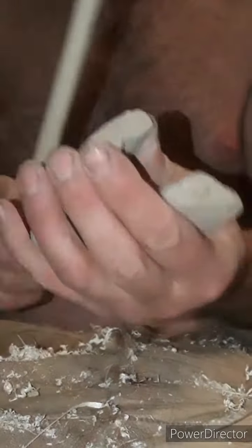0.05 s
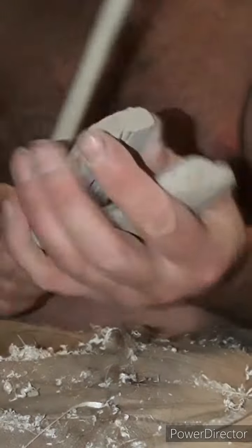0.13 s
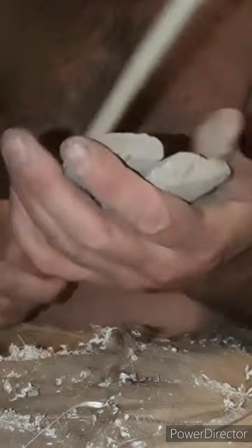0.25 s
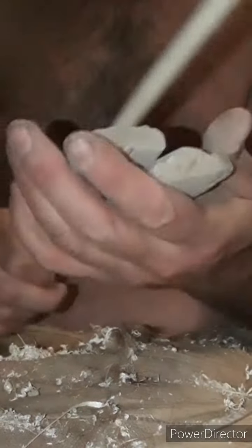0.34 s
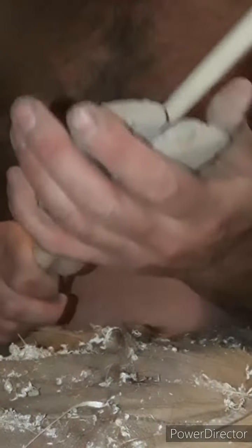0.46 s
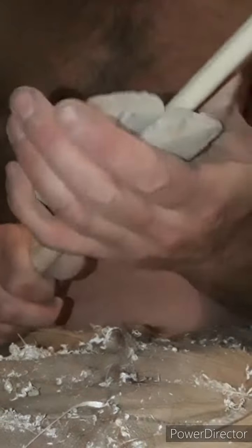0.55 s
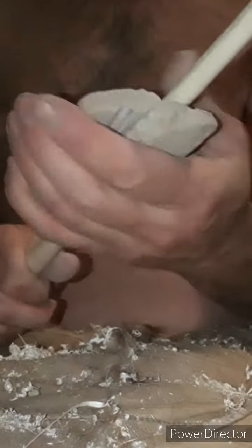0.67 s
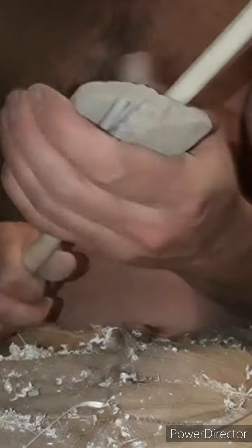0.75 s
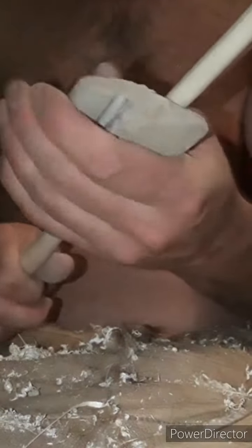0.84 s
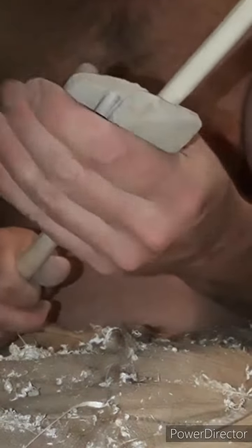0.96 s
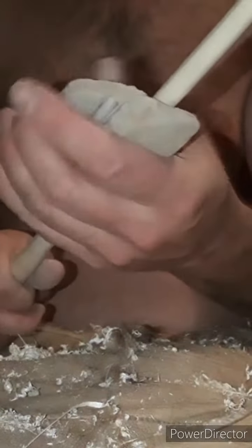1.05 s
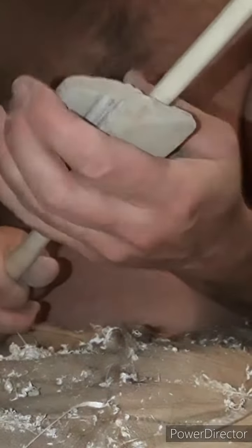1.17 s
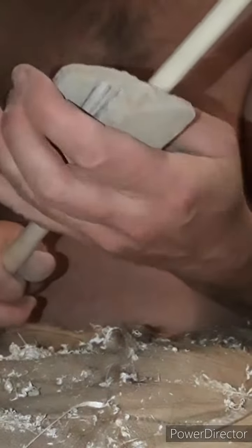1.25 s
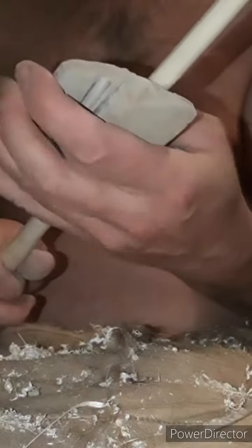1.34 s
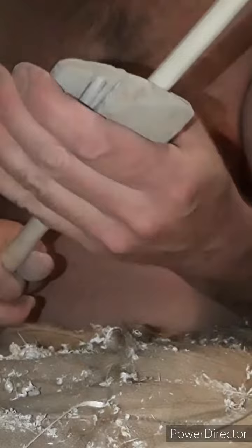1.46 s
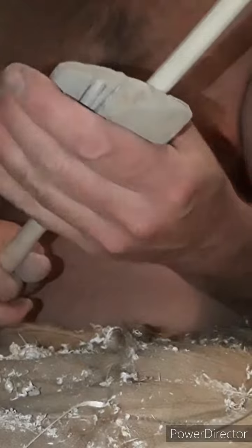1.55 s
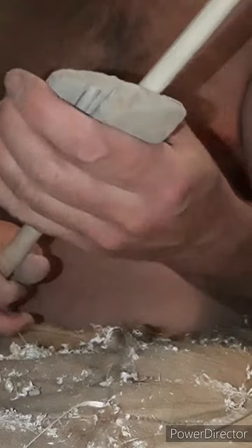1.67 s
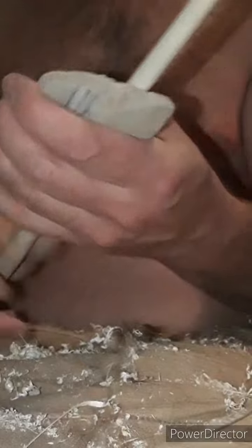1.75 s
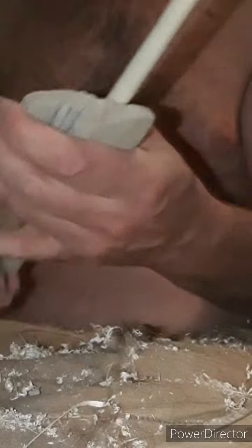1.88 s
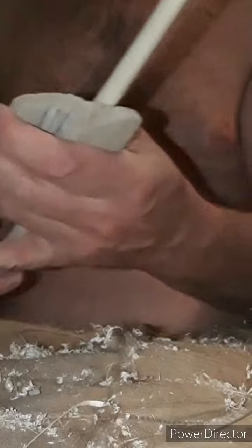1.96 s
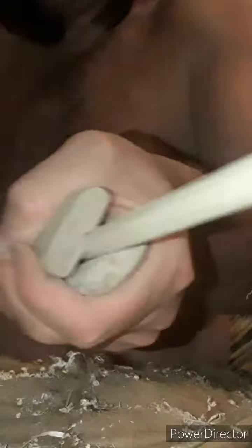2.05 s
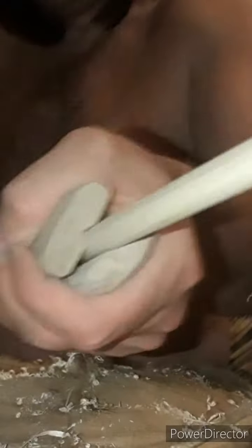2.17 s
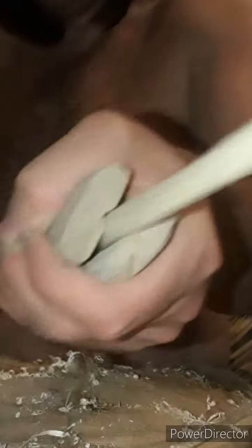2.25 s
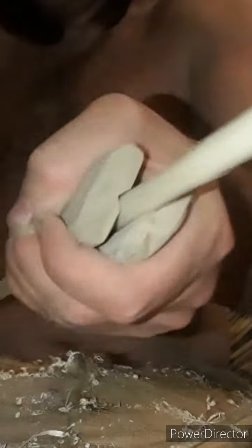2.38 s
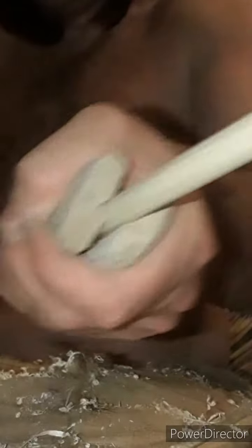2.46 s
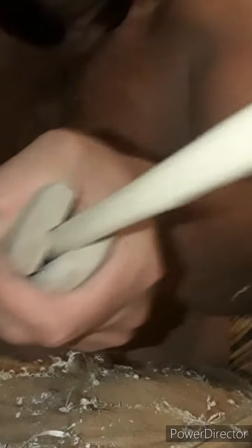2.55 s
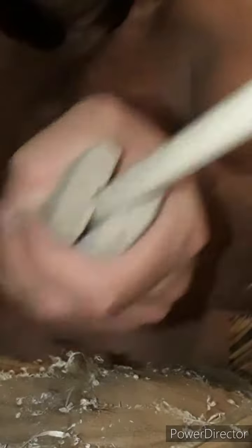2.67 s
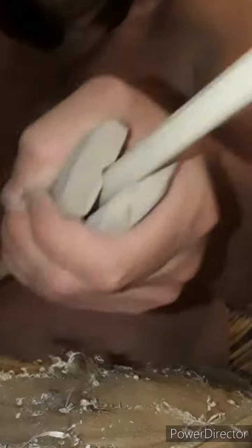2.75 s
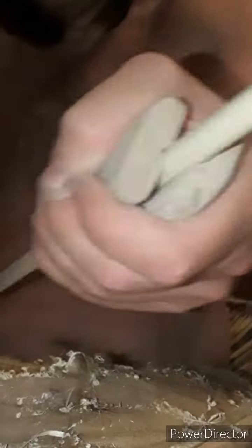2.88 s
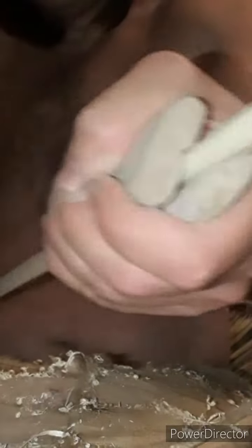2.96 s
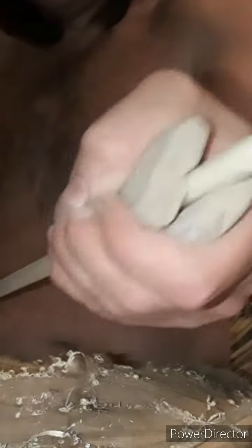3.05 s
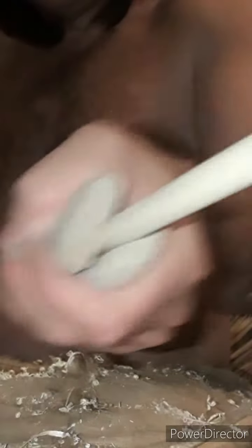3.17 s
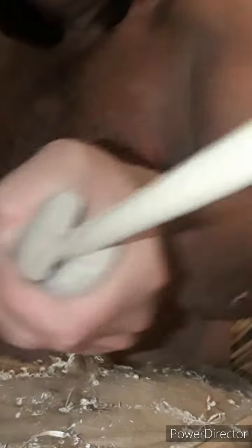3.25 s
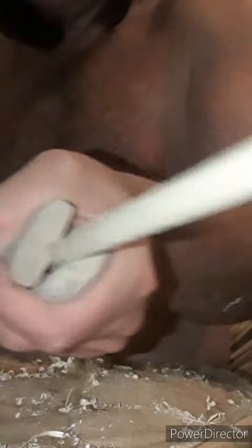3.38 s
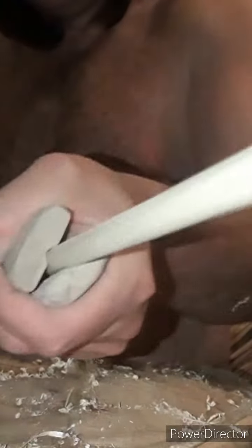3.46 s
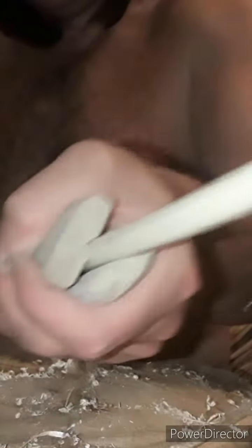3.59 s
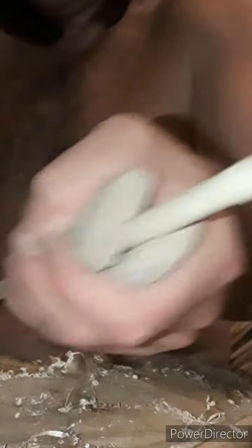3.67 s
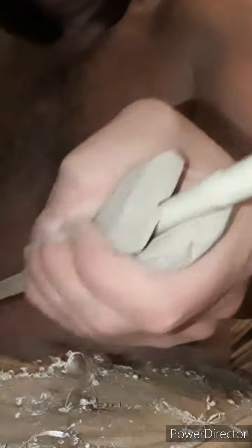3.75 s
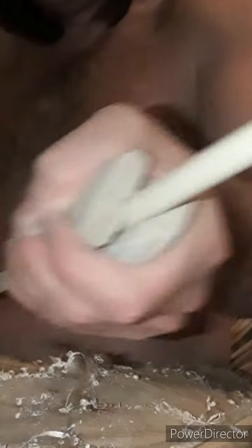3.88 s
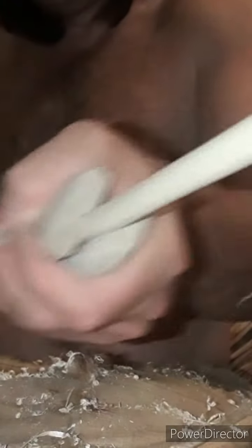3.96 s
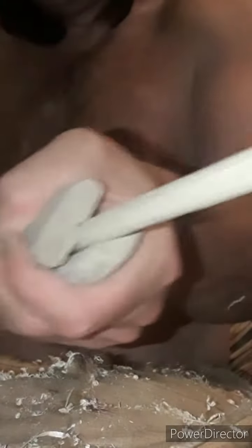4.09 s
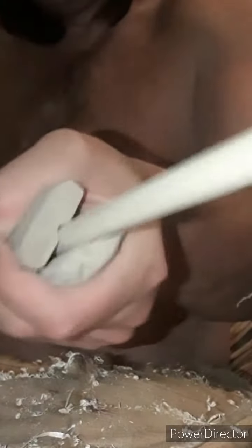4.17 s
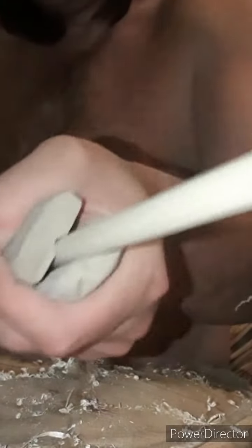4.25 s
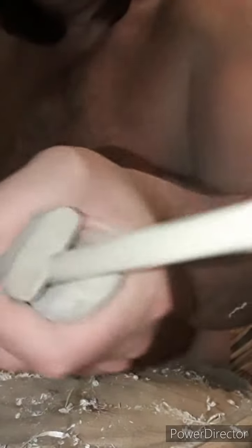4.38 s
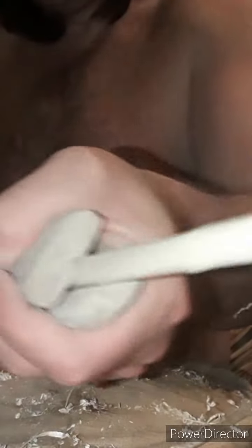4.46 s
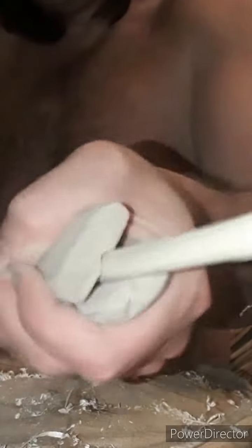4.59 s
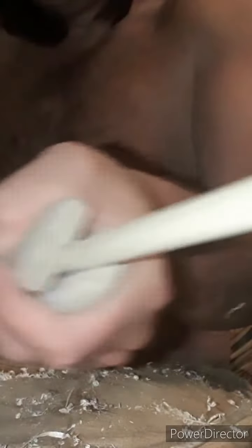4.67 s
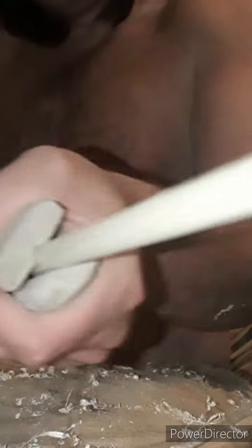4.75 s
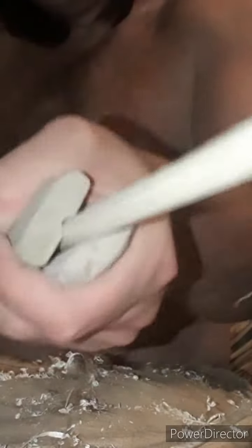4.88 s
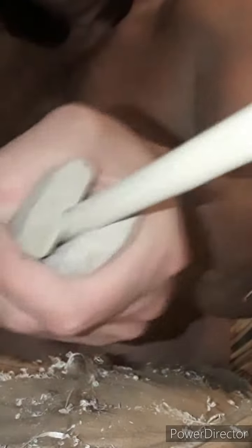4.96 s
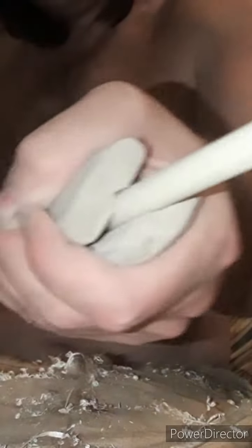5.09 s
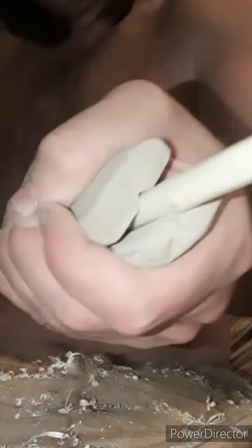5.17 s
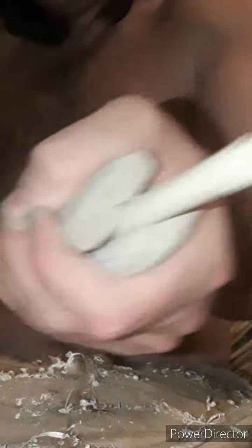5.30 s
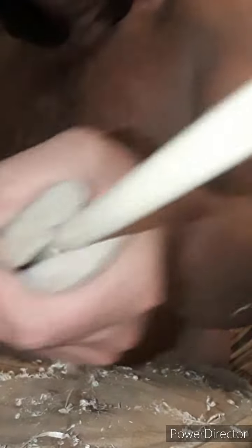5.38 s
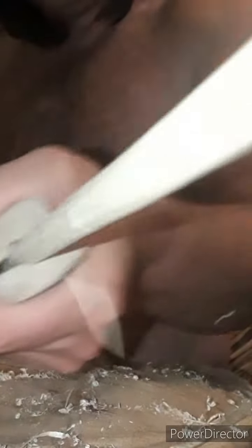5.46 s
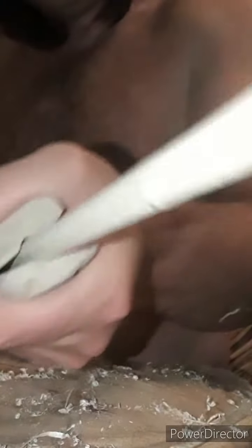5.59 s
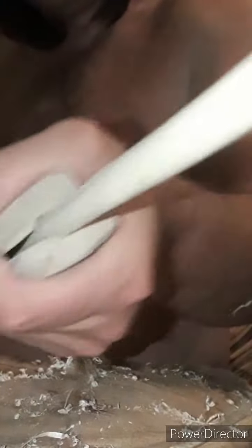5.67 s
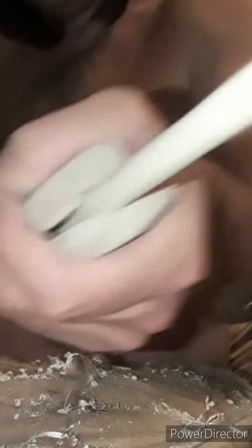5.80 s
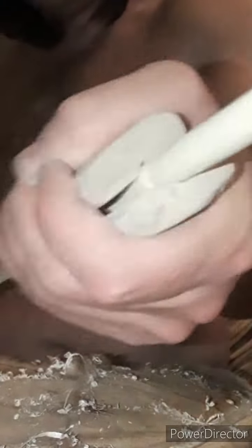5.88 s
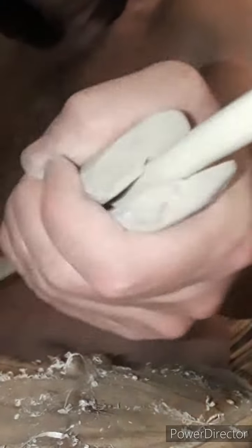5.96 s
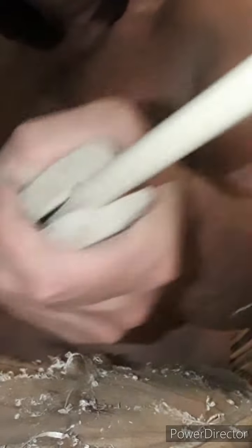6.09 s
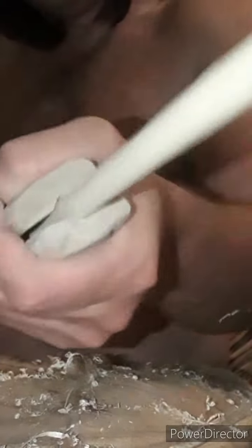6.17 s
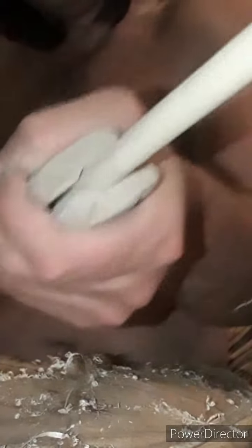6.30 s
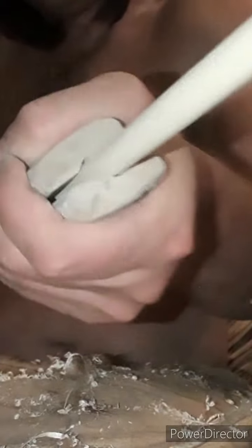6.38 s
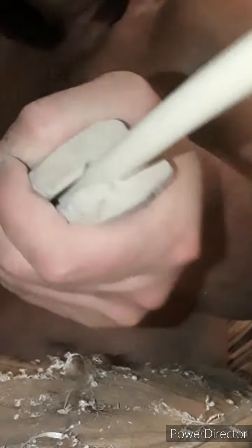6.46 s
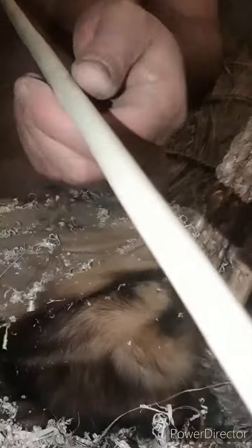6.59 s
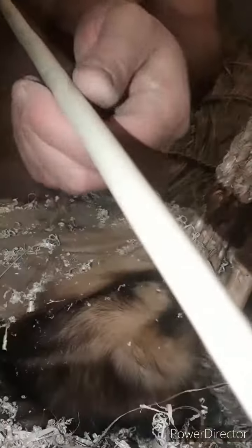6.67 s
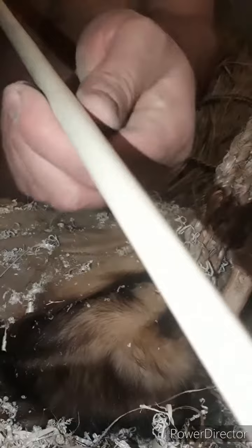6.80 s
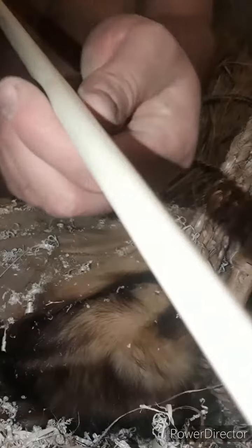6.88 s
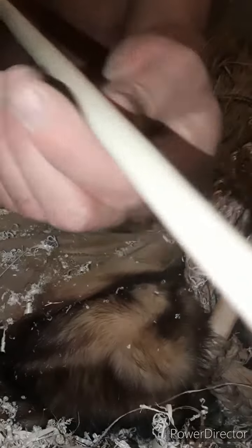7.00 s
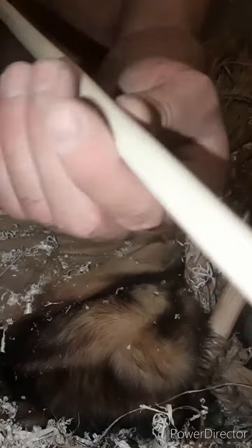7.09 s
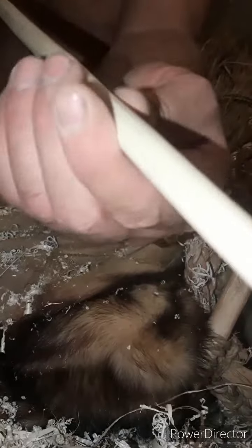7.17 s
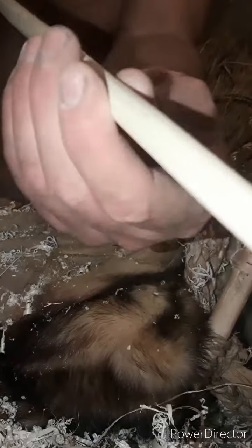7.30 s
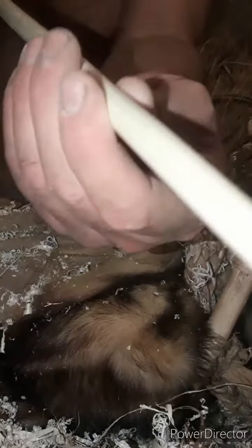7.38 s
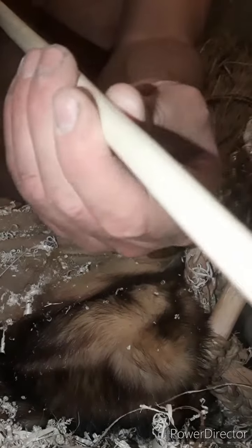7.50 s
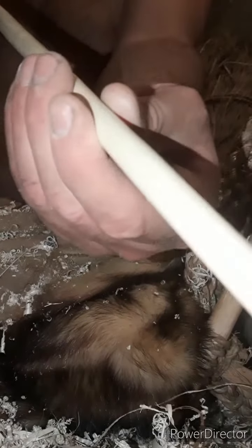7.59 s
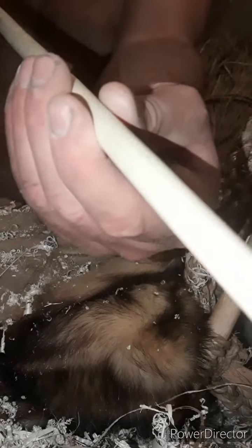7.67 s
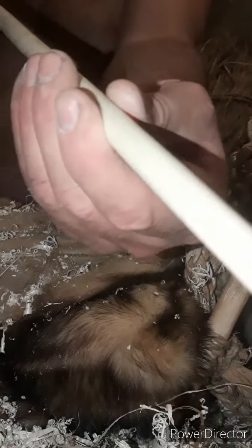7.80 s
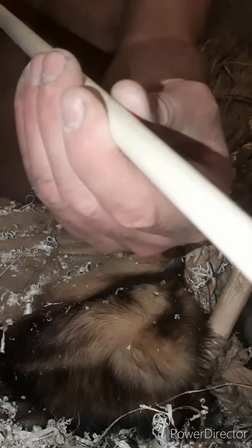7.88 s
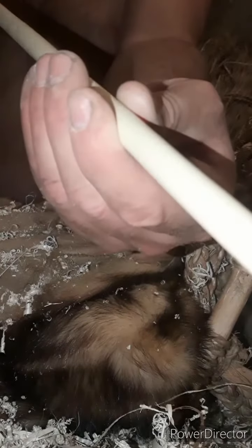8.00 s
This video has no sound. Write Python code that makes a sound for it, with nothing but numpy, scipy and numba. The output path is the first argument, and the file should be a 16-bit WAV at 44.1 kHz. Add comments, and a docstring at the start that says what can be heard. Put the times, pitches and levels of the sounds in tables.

```python
"""Two grooved stones, held in one hand, grind and click as they close round a wooden shaft in a quiet shed.
Thirteen strokes then rasp to and fro, knocking at rough spots; last a bare palm hisses along the wood.
Short silences part the three. Stone and shaft are banks of damped modes, struck or excited by noise;
the rasp is coloured noise driven by hand speed, combed by a delayed copy from the shaft's tip.
Rumble, hum and hiss lie underneath."""
import sys
import numpy as np
from scipy import signal
from scipy.fft import rfft, irfft, next_fast_len
from scipy.io import wavfile
from scipy.ndimage import uniform_filter1d, map_coordinates
from numba import njit

SR = 44100
rng = np.random.default_rng(int(sys.argv[2]) if len(sys.argv) > 2 else 0)


def attenuation_scalar(level_db):
    """Turn a level in dB into a linear amplitude multiplier (20 dB per decade)."""
    decades = np.asarray(level_db, float) / 20
    return 10 ** decades


def log_audio(samples):
    """Write samples as a 16-bit WAV file to the path given in sys.argv[1]."""
    # one column per channel
    frames = np.atleast_2d(samples).T
    # limit to full scale, then quantise
    limited = np.clip(frames, -1, 1)
    pcm = np.round(limited * 32767).astype(np.int16)
    wavfile.write(sys.argv[1], SR, pcm)


N = 354563
T = np.arange(N) / SR

# shaft modes: pitch_hz, level_db, undamped t60_s
SHAFT_MODES = [(357, 16, 0.06), (606, -7.5, 0.052), (850, 8, 0.043), (946, 7, 0.028), (1290, 10.5, 0.011),
               (1538, -2.5, 0.031), (1790, 0, 0.036), (1950, -4, 0.063), (2522, 5.5, 0.015),
               (2674, 2.5, 0.045), (2987, 2.5, 0.022)]
# shaft catching in the groove: start_s, level_db, favoured_hz, crack_db (re level_db)
CATCHES = [(2.509, -33, 2680, -8), (2.73, -57, 1560, 8), (2.761, -60, 926, 16), (2.939, -32, 1730, -8),
           (2.969, -33, 1180, -14), (2.997, -30, 1590, -14), (3.081, -42, 853, -10), (3.178, -38, 1400, -8),
           (3.24, -33, 2610, -4), (3.254, -33, 850, -10), (3.325, -32, 1500, -8), (3.335, -32, 1500, -8),
           (3.955, -32, 1300, -6), (4.199, -52, 2700, 4), (4.727, -35, 950, -12), (4.913, -54, 2700, 4),
           (5.105, -28, 2380, -4), (5.137, -43, 450, -10), (5.452, -30, 2800, -10), (6.148, -32, 2690, -8),
           (6.343, -46, 2730, 6), (4.704, -22, 1900, -3), (5.441, -23, 2500, 3), (6.126, -24, 1800, -4),
           (6.136, -24, 2600, -5)]
# silences between the parts: sound_out_s, sound_back_s
SILENCES = [(2.066, 2.123), (6.478, 6.535)]


def unit(x):
    """Scale to rms 1."""
    return x / np.sqrt(np.mean(x ** 2))


def colour(x, points):
    """Filter by (Hz, dB) points, straight in dB over log frequency."""
    hz, db = np.transpose(points)
    size = next_fast_len(len(x))
    bin_hz = np.arange(1, size // 2 + 2) * SR / size
    gain = attenuation_scalar(np.interp(np.log(bin_hz), np.log(hz), db))
    return irfft(rfft(x, size) * gain, size)[:len(x)]


def ring(x, hz, t60_s):
    """One fixed resonance, silent at both ends of the spectrum."""
    radius = np.exp(-np.log(1000) / (t60_s * SR))
    angle = 2 * np.pi * hz / SR
    return signal.lfilter([.5, 0, -.5], [1, -2 * radius * np.cos(angle), radius ** 2], x)


@njit
def glide(x, hz, sharp):
    """Band-pass of Q sharp whose centre moves every sample."""
    y = np.empty(len(x))
    band, low, k = 0., 0., 1 / sharp
    for i in range(len(x)):
        g = np.tan(np.pi * hz[i] / SR)
        v = (band + g * (x[i] - low)) / (1 + g * (g + k))
        band = 2 * v - band
        low += 2 * g * v
        y[i] = k * v
    return y


def grit(scatter_db):
    """Dense micro-slips of uneven size: noise with random sample-by-sample gain."""
    boost_db = scatter_db * np.minimum(rng.standard_exponential(N), 4)
    return unit(rng.standard_normal(N) * attenuation_scalar(boost_db))


def walk(rate_hz):
    """Random levels held 1 / rate_hz s and slewed twice."""
    hold = int(SR / rate_hz)
    held = np.repeat(rng.standard_normal(N // hold + 1), hold)
    return 1.1 * uniform_filter1d(uniform_filter1d(held, hold), hold)[:N]


def rubbed(modes, lo_hz, hi_hz, damp, scatter_db=2):
    """Grit exciting the modes between two pitches, their t60 scaled by the grip."""
    x = grit(scatter_db)
    return unit(sum(attenuation_scalar(db) * unit(ring(x, hz, t60_s * damp))
                    for hz, db, t60_s in modes if lo_hz < hz < hi_hz))


def blow(modes, favour_hz, octaves, damp, contact_ms):
    """One hit, peak 1: the place struck favours modes near one pitch; the push builds over the contact time."""
    t = T[:4096]
    y = 0
    for hz, db, t60_s in modes:
        level_chance, pitch_chance, phase_chance = rng.standard_normal(3)
        place = (np.log2(hz / favour_hz) / octaves) ** 2
        decay = np.exp(-place - np.log(1000) * t / (t60_s * damp))
        tone = np.sin(2 * np.pi * hz * (1 + 0.0083 * pitch_chance) * t + .5 * phase_chance)
        y = y + attenuation_scalar(db + 1.6 * level_chance) * decay * tone
    y = y * np.sin(np.pi / 2 * np.clip(t * 1000 / contact_ms, 0, 1)) ** 2
    return y / np.abs(y).max()


def add(out, s, x):
    """Mix x into out at time s."""
    i = int(s * SR)
    out[i:i + len(x)] += x[:N - i]


def shed():
    """Filtered noise for rumble and microphone hiss, plus a wavering hum; near mono, with a little side noise."""
    # room tone: pitch_hz, level_db (per Hz)
    tone_points = [(15, -53.5), (25, -34), (108, -2), (175, -10), (503, -23), (659, -24), (840, -24.5),
                   (911, -24.5), (1700, -30), (3720, -27.5), (5140, -27), (5730, -28.5), (8360, -42.5),
                   (14000, -21), (16000, -30)]
    # faint side noise, quieter than the middle at most pitches: pitch_hz, side_minus_mid_db
    side_points = [(60, -20.5), (110, -25.5), (200, -22.5), (380, -16.5), (700, -13.5), (1290, -11),
                   (2380, -8.5), (4400, -10), (8120, 2.5), (15000, -14.5)]
    mid = unit(colour(rng.standard_normal(N), tone_points))
    side = colour(unit(colour(rng.standard_normal(N), tone_points)), side_points)
    hum = attenuation_scalar(-9.5 + 2.1 * walk(3.7)) * unit(ring(rng.standard_normal(N), 119, 0.17))
    return attenuation_scalar(-68) * (mid + hum + side * np.array([[1], [-1]]))


def scrapes():
    """Gains of the four rings of dragging stones: quick onset, a sag while dragging, then dying away."""
    # drags: start_s, length_s, main_ring_db, upper_ring_db, lower_ring_db, shaft_db
    drags = [(0, 0.045, -64, -71, -56, -68), (0.157, 0.22, -65, -64.5, -72, -80),
             (0.242, 0.033, -78, -58.5, -51, -90), (0.29, 0.049, -76, -68, -59, -71),
             (0.554, 0.094, -72, -64.5, -59.5, -61.5), (0.615, 0.16, -59, -66, -78, -73.5),
             (0.79, 0.062, -60, -68, -85, -90), (0.844, 0.1, -62, -64, -70, -75),
             (0.89, 0.059, -54, -64, -61, -63.5), (0.913, 0.035, -56, -57, -54.5, -70),
             (.95, 0.091, -56.5, -60.5, -57.5, -63.5), (1.095, 0.065, -60.5, -68, -70, -76),
             (1.205, 0.085, -56, -59.5, -82, -80), (1.26, 0.048, -54, -64, -54, -60.5),
             (1.371, 0.089, -55.5, -60.5, -67, -78), (1.446, 0.11, -58, -59.5, -63.5, -77),
             (1.6, 0.15, -73, -77, -82, -90), (1.8, .25, -84, -79.5, -92, -87)]
    attack_s, sag_db, t60_s = 0.0036, 11, 0.22
    power = 0
    for s, length_s, *ring_db in drags:
        t = T - s
        fall_db = sag_db * np.clip(t / length_s, 0, 1) + 60 * np.maximum(t - length_s, 0) / t60_s
        envelope = np.clip(t / attack_s, 0, 1) * attenuation_scalar(-fall_db)
        power = power + (attenuation_scalar(np.array(ring_db)[:, None]) * envelope) ** 2
    return np.sqrt(power)


def seating():
    """The stones grind lightly and click as the hand closes on the shaft; the grip shifts their main ring."""
    # stone modes: pitch_hz, level_db, undamped t60_s
    stone_modes = [(2880, -26.5, 0.11), (3067, -29, 0.081), (3504, -16, 0.038), (3690, -20.5, 0.15),
                   (3950, -17.5, 0.073), (4160, -23, 0.12), (4605, -3.5, 0.14), (4930, 1, 0.13),
                   (6056, -4.5, 0.095), (6030, -18, 0.048), (7270, -12.5, 0.036), (7560, -12.5, 0.2)]
    # main ring under the grip: time_s, pitch_hz
    grip = [(0, 4560), (.21, 4970), (.26, 4600), (.68, 4590), (.81, 4880), (1.2, 5100), (1.31, 4960),
            (1.5, 5040), (1.8, 4840)]
    # stone on stone: start_s, main_ring_peak_db, favoured_hz, upper_ring_db, shaft_db (both re main ring)
    clicks = [(0.002, -41.5, 4400, -20, -36), (0.018, -49, 4520, -28, -40), (0.159, -58, 4600, -5, 0),
              (0.238, -35, 4920, 1.5, -43.5), (0.2424, -30.5, 4700, -21, -38), (0.249, -36, 3530, 3, -33),
              (0.2912, -17, 4540, -26, -45), (0.2943, -37, 4570, -34, -44),
              (0.3002, -26.5, 4280, -8.5, -33.5), (0.305, -35, 4500, -28, -37.5),
              (0.3119, -29.5, 4400, -15, -34.5), (0.552, -53.5, 4520, -14, 0),
              (0.5806, -43.5, 4600, -11, 0.5), (0.5967, -46.5, 4550, -23.5, 6.5),
              (0.697, -46, 4460, -26, -15), (0.7903, -55, 4990, -18, -26), (0.8877, -55, 4890, -21, -7),
              (0.9763, -46, 4870, -36, -16), (1.0042, -49, 5120, 0, -19), (1.1092, -50, 5100, -22, -25),
              (1.209, -49.5, 5200, -17.5, -35.5), (1.2511, -45, 5230, -4, -28),
              (1.2642, -27.5, 5350, -28, -20), (1.273, -32.5, 4130, -23.5, -17),
              (1.3768, -55, 4930, -8, -30), (1.4506, -40, 5380, -20, -20)]
    main_hz = np.interp(T, *np.transpose(grip))
    on_main, on_upper, on_lower, on_shaft = scrapes()
    main = unit(glide(glide(grit(3), main_hz, 15.0), main_hz, 4.2))
    upper = rubbed(stone_modes, 6500, 9000, 0.27)
    lower = rubbed(stone_modes, 2400, 4400, 0.26)
    shaft = rubbed(SHAFT_MODES, 900, 1100, 0.51)
    grind = on_main * main + on_upper * upper + on_lower * lower + on_shaft * shaft
    out = attenuation_scalar(2 * walk(58.56)) * grind
    for s, db, hz, upper_db, shaft_db in clicks:
        hit = blow(stone_modes, hz, 0.12, 0.25, 1.1)
        hit = hit + attenuation_scalar(upper_db) * blow(stone_modes, 6890, 0.11, 0.555, 0.93)
        hit = hit + attenuation_scalar(-15.5) * blow(stone_modes, 3110, 0.18, 0.13, 1.0)
        hit = hit + attenuation_scalar(shaft_db) * blow(SHAFT_MODES, 1230, 0.42, 0.44, 0.97)
        add(out, s, attenuation_scalar(db) * hit)
    return out


def sweep(s, length_s, fastest=0.42):
    """Hand speed 0-1 over one movement, peaking at the share fastest of its length."""
    u = np.clip((T - s) / length_s, 0, 1)
    bend = np.log(.5) / np.log(np.clip(fastest, .2, .8))
    return np.abs(np.sin(np.pi * u ** bend))


def strokes():
    """Rasp gain from hand speed, tip lag from distance travelled, judder and bending from both."""
    # strokes: start_s, length_s, rasp_db, fastest_share, judder_db, bending_db
    # (judder and bending re rasp, before the fade with lag)
    moves = [(2.024, 0.4, -41, 0.61, -4, -10), (2.426, 0.31, -40.5, 0.52, -7.5, -13),
             (2.763, 0.33, -42.5, 0.46, -4.5, -10.5), (3.079, 0.37, -39.5, .58, -7.5, -12.5),
             (3.485, 0.37, -40.5, .44, -7, -12), (3.811, 0.33, -38, 0.64, -3.5, -15),
             (4.184, 0.42, -41.5, 0.44, -10.5, -20), (4.598, 0.29, -40, 0.59, -10.5, -24),
             (4.934, 0.35, -42.5, 0.48, -8.5, -16.5), (5.271, 0.34, -39.5, 0.59, -7, -17.5),
             (5.63, 0.36, -40, 0.54, -7.5, -12.5), (5.968, 0.37, -41, .56, -12.5, -21.5),
             (6.341, 0.37, -41, 0.42, -11, -21.5)]
    # lag_ms of the tip's sound at each turn
    # (longer = tip pokes further out; under 0 = short free end, tip's copy unheard)
    turn_lag_ms = [0.62, -.2, 0.446, -.25, .72, -0.38, 0.776, -.25, .42, -.25, .4, -.25, 0.422, -0.059]
    # short jerks of the hand, mostly at a turn: start_s, length_s, rasp_db
    jerks = [(2.745, 0.035, -56), (3.086, 0.041, -47.5), (4.912, 0.044, -56), (6.34, 0.032, -54.5),
             (2.59, 0.068, -42)]
    speed_law, rest_db = 1.23, -72.5  # rasp amplitude goes with speed to this power
    surge_db, surge_s = -9.5, 0.0062  # a knock makes the grit bite harder for a moment
    shake_law = 0.29  # judder and bending grow faster with speed than the rasp does
    fade_lag_ms, fade_limit_ms = 0.079, 0.2  # they fade past this lag, over at most this much more
    judder_db_per_ms, bend_db_per_ms = 45.5, 35

    power, lag_ms = attenuation_scalar(rest_db) ** 2, turn_lag_ms[0]
    for (s, length_s, db, fastest, _, _), move_ms in zip(moves, np.diff(turn_lag_ms)):
        speed = sweep(s, length_s, fastest)
        power = power + (attenuation_scalar(db) * speed ** speed_law) ** 2
        lag_ms = lag_ms + move_ms * np.cumsum(speed) / speed.sum()
    for s, length_s, db in jerks:
        power = power + (attenuation_scalar(db) * sweep(s, length_s)) ** 2
    for s, db, _, _ in CATCHES:
        surge = (T > s) * np.exp(-np.abs(T - s) / surge_s)
        power = power + (attenuation_scalar(db + surge_db) * surge) ** 2

    rows = np.array(moves)
    now = np.maximum(np.searchsorted(rows[:, 0], T) - 1, 0)
    out_ms = np.clip(lag_ms - fade_lag_ms, 0, fade_limit_ms)
    shake_db = shake_law * (10 * np.log10(power) - rows[now, 2])
    judder_db = shake_db + rows[now, 4] - judder_db_per_ms * out_ms
    bend_db = shake_db + rows[now, 5] - bend_db_per_ms * out_ms
    return np.sqrt(power), lag_ms, judder_db, bend_db


def fibre_rasp(lag_ms):
    """Grit tears the wood fibres: coloured noise, plus a copy leaving by the tip that draws moving combs."""
    # rasp spectrum: pitch_hz, level_db (per Hz)
    rasp_points = [(1000, -44), (1600, -11), (2150, -19), (2600, -6), (3250, -1), (3600, 0), (4950, 5),
                   (6250, 0.5), (8150, 0.5), (9850, -11.5), (12000, -9.5), (14000, -10.5), (15400, -14.5),
                   (16000, -38)]
    rasp = colour(grit(2.3), rasp_points)
    body = unit(colour(rasp, [(8800, -20.5), (10000, -34)]))
    body = body + attenuation_scalar(-9.5 + 3.1 * walk(12)) * rubbed(SHAFT_MODES, 2200, 3200, .5)
    dust = unit(colour(rasp, [(8800, -41.5), (10000, -29.5)]))
    bright = attenuation_scalar(1.59 * walk(40) + 1.04 * walk(13)) * (unit(body) + attenuation_scalar(-12.5) * dust)
    # tip's copy: a quarter turn ahead in phase, treble favoured by the thin tip
    turned = -signal.hilbert(bright, next_fast_len(N)).imag[:N]
    turned = colour(turned, [(2500, -16.5), (7000, 6)])
    share = .36 * np.clip((lag_ms - .1) / .1, 0, 1)
    delay = (lag_ms + 0.013 * walk(60)) * SR / 1000
    tip = map_coordinates(turned, [np.arange(N) - delay], order=3)
    return (bright + share * tip) / np.sqrt(1 + share ** 2)


def bending(lag_ms):
    """Free end as a clamped rod, pitch going with one over free length squared: lowest mode and overtones."""
    # overtones: multiple of lowest pitch, level_db
    overtone_rows = [(3.2, 0), (6.3, -2)]
    free_cm = 10.28 + (.17 * np.logaddexp(0, lag_ms / .17) - .15) / 0.0421
    hz = np.minimum(56000 / free_cm ** 2, 1500.)
    slips = grit(3.45) * attenuation_scalar(7.8 * walk(50))
    lowest = unit(glide(glide(slips, hz, 4.3), hz, 0.58) / np.sqrt(hz))
    overtones = 0
    for k, db in np.array(overtone_rows):
        tone = glide(glide(slips, k * hz, 12.), k * hz, 3.) / np.sqrt(k * hz)
        overtones = overtones + attenuation_scalar(db) * tone
    return lowest, unit(overtones)


def knock(out, s, db, hz, crack_db):
    """Shaft catching in the groove: a struck-shaft thud plus a sharp burst of ringing noise."""
    thud = colour(blow(SHAFT_MODES, hz, 0.51, 0.75, 1100 / hz), [(150, -28), (500, 0)])
    crack = signal.lfilter([1, -1], 1, rng.standard_normal(2048)) * np.exp(-T[:2048] / 0.00178)
    crack = ring(ring(crack, 4500, 0.00129), 4700, 0.001)
    add(out, s, attenuation_scalar(db) * thud)
    add(out, s, attenuation_scalar(db + crack_db) * crack / np.abs(crack).max())


def sanding():
    """Broad rasp of torn fibres, the shaft juddering under it, its free end bending, knocks on top."""
    gain, lag_ms, judder_db, bend_db = strokes()
    bright = fibre_rasp(lag_ms)
    bend, overtones = bending(lag_ms)
    judder = attenuation_scalar(3.0 * walk(45)) * rubbed(SHAFT_MODES, 500, 2200, 0.41)
    judder = unit(judder) + attenuation_scalar(1) * overtones
    # dull rub felt through the palm
    rub = unit(colour(grit(5), [(100, -23), (180, 0), (600, -1.5), (900, -27.5)]))
    out = gain * (bright + attenuation_scalar(judder_db) * unit(judder) + attenuation_scalar(bend_db) * unit(bend + attenuation_scalar(-2) * rub))
    for s, db, hz, crack_db in CATCHES:
        knock(out, s, db, hz, crack_db)
    return out


def palm():
    """Skin on smooth wood: a faint soft hiss in two noise bands."""
    # slide: time_s, hiss_db, upper_band_db (re hiss)
    slide = [(6.54, -85.5, 15.5), (6.548, -79.5, 2), (6.822, -72, 2), (6.972, -74, -3.5), (7.094, -89, 8.5),
             (7.21, -84, -8), (7.336, -80.5, 4), (7.398, -76.5, -3), (7.478, -86, -3), (7.604, -79, 3),
             (7.682, -79.5, 4), (7.704, -75, 1), (7.928, -84.5, -8), (8.008, -73.5, -0.5), (8.04, -79, 5)]
    s, hiss_db, upper_db = np.transpose(slide)
    db = np.interp(T, s, hiss_db, -150, -150)
    low = unit(colour(grit(1.5), [(2500, -27), (4000, -7.0), (5200, -1.0), (6500, -0.5), (7500, -15.5)]))
    high = unit(colour(grit(1.7), [(6500, -29), (7200, 2.0), (7800, 3), (8700, -4.5), (9300, -17.5)]))
    return attenuation_scalar(db) * (low + attenuation_scalar(np.interp(T, s, upper_db)) * high)


def scene():
    """Three parts, each with a short tail from bench and walls, over the shed tone."""
    t = T[:SR // 4]
    tail = rng.standard_normal(len(t)) * np.exp(-np.log(1000) * t / 0.14) * (t > .004)
    tail = tail / np.sqrt(np.sum(tail ** 2))
    part = np.searchsorted([np.mean(silence) for silence in SILENCES], T)
    out = shed()
    for k, hand in enumerate([seating(), sanding(), palm()]):
        wet = signal.oaconvolve(hand, tail)[:N]
        out = out + (part == k) * (hand + attenuation_scalar(-13.5) * wet)
    return out


def top_cut(x):
    """Nothing passes above the cut-off."""
    return signal.sosfilt(signal.butter(12, 16170, fs=SR, output="sos"), x)


def record(dry):
    """Mute everything, shed tone included, in the silences between parts."""
    fade_s = 0.0013
    gate = 1
    for out_s, back_s in SILENCES:
        gate = gate * np.clip(np.maximum(out_s - T, T - back_s) / fade_s + 1, 0, 1) ** 2
    return top_cut(dry * gate)


dry = scene()
out = record(dry)
log_audio(out)
```